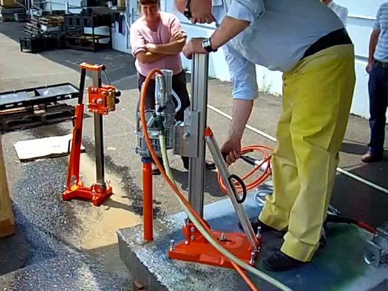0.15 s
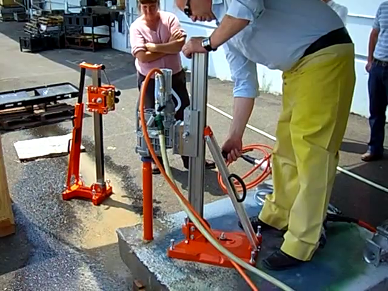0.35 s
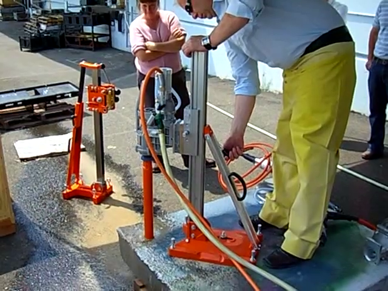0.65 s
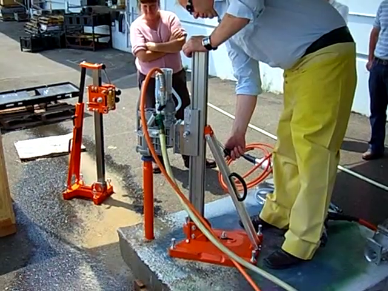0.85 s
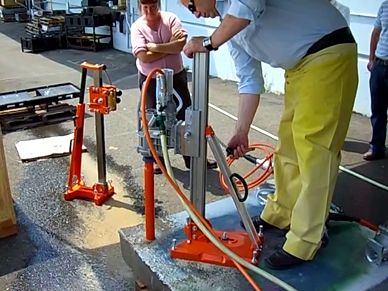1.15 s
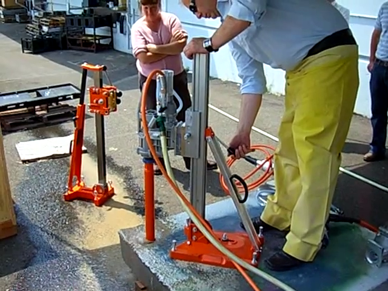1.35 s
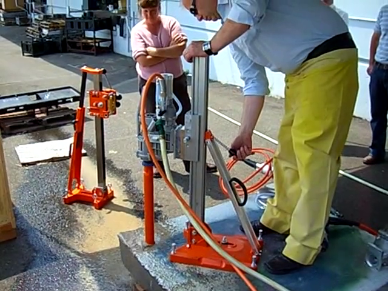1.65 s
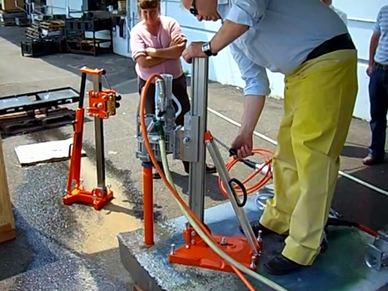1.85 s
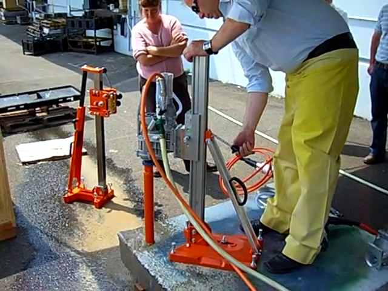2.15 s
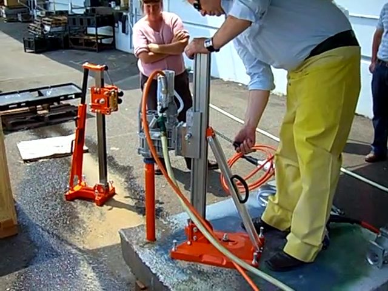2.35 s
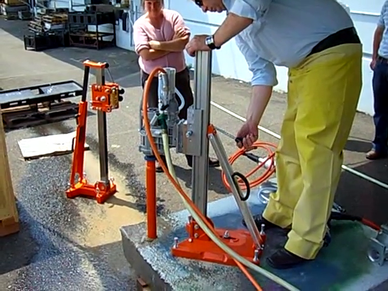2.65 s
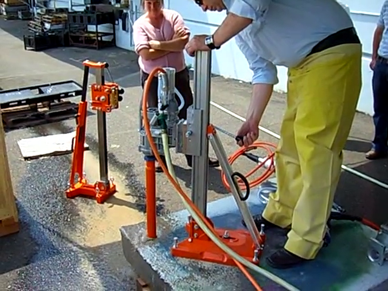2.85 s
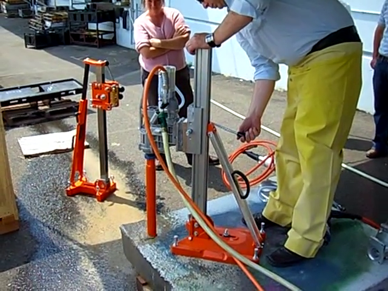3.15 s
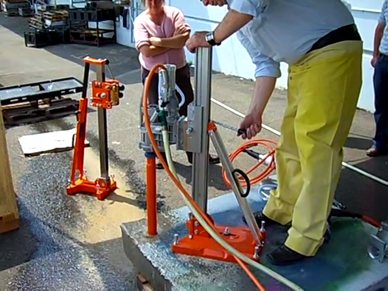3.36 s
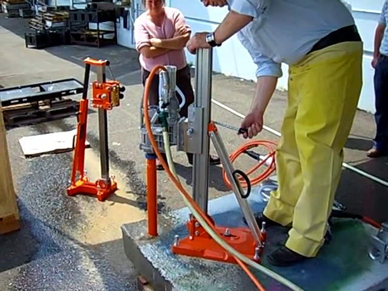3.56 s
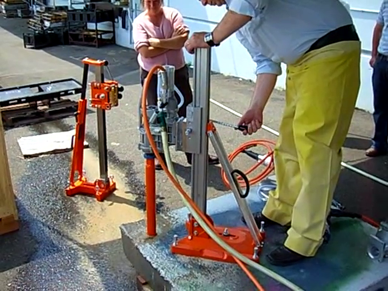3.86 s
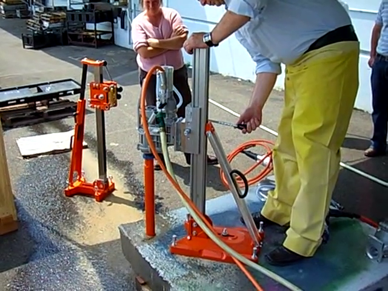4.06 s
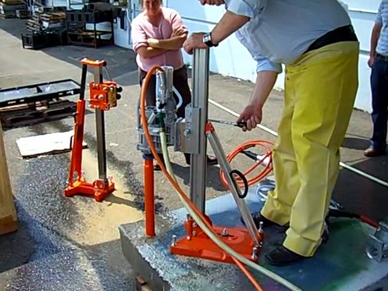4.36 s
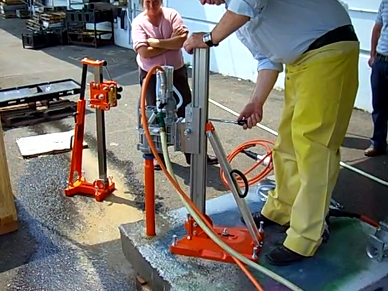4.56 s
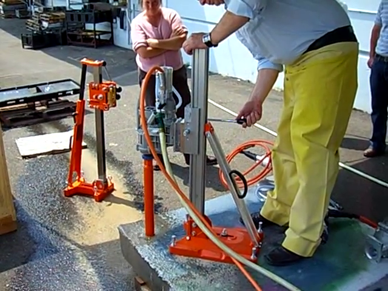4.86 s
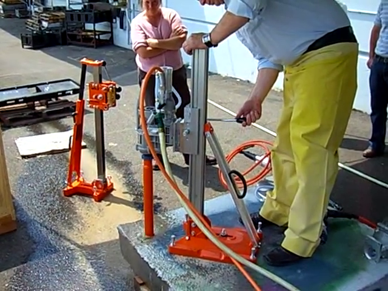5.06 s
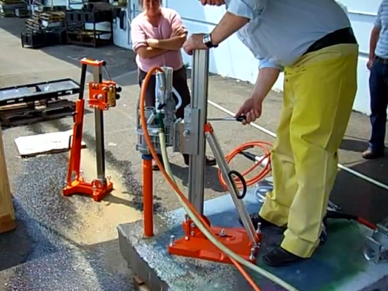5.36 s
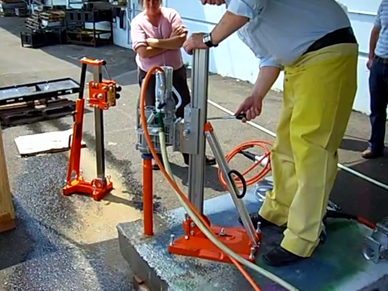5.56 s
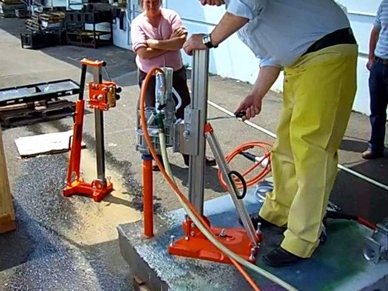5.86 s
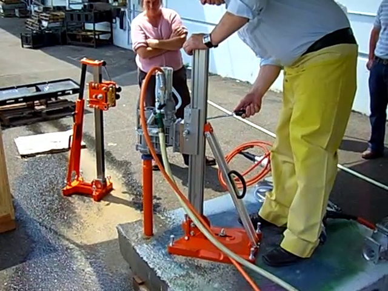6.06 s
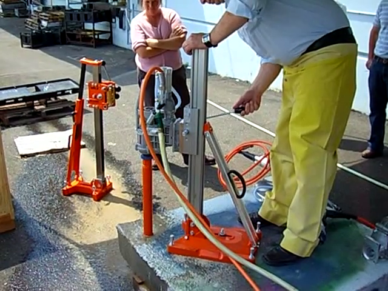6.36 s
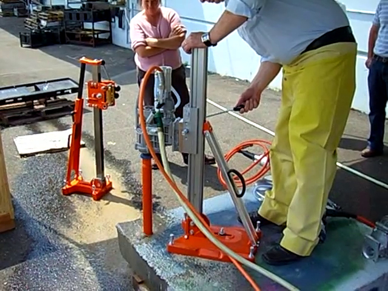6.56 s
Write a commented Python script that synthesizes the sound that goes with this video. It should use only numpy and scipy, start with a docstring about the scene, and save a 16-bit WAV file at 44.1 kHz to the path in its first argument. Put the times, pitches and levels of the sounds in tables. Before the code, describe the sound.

An electric core drill whines shrill and steady while grinding into wet concrete outdoors, with a rough metallic rattle and rushing spray hiss.

```python
"""Outdoors, an electric core drill on a steel stand bores into wet concrete.
Motor pinion and three geared shafts whine as tones locked to one drifting motor speed.
The diamond crown is noise plus a clatter pattern repeated each turn, coloured by barrel, gearbox and stand;
bass follows levels of its own through foot and column, and single spindle hums swell for a moment.
Cooling air and water hiss as treble noise; a light breeze rumbles as low noise on the microphone."""
import sys
import numpy as np
from scipy import signal
from scipy.fft import rfft, irfft
from scipy.io import wavfile
from scipy.ndimage import map_coordinates

SR = 44100
rng = np.random.default_rng(int(sys.argv[2]) if len(sys.argv) > 2 else 0)


def voltage_ratio(decibels):
    """Convert decibels (scalar or array-like) to amplitude ratios, 20 dB per decade."""
    exponent = np.asarray(decibels, float) / 20
    return 10 ** exponent


def transcribe(u):
    """Save the signal u as a 16-bit wav file named by the first command-line argument.

    u: samples, shape (n,) or (channels, n), limited to [-1, 1]; the rate is SR.
    q: integer samples, one column per channel.
    """
    v = np.clip(np.atleast_2d(u).T, -1, 1)
    q = np.round(v * 32767).astype(np.int16)
    wavfile.write(sys.argv[1], SR, q)


N = 295470

PINION_TEETH, MESH_TEETH = 9, 14
# turns of each shaft per motor turn
FIRST_SHAFT, SECOND_SHAFT, SPINDLE = 9 / 38, 9 / 38 * 12 / 31, 1 / 28.4665


def curve(table):
    """A drawn automation curve: straight lines between the points, first column in seconds."""
    seconds, values = np.transpose(table)
    return np.interp(np.arange(N) / SR, seconds, values)


def walk(rate):
    """Random drift: rate new values a second, joined by half-cosine slides; spread near 1."""
    knots = rng.standard_normal(int(N * rate / SR) + 3)
    # computed once every 64 samples, then held
    place = np.arange(0, N + 64, 64) * rate / SR
    whole = place.astype(int)
    slide = .5 - .5 * np.cos(np.pi * (place - whole))
    coarse = 1.15 * (knots[whole] * (1 - slide) + knots[whole + 1] * slide)
    return np.repeat(coarse, 64)[:N]


def shape(points):
    """Filter gain at every frequency from (Hz, dB) points, joined on a log frequency scale."""
    hz, db = np.transpose(points)
    return voltage_ratio(np.interp(np.log(np.fft.rfftfreq(N, 1 / SR) + 1), np.log(hz), db))


def band_level(spectrum, lo_hz, hi_hz):
    """Turns a spectrum into a wave, scaled so that its band from lo_hz to hi_hz has rms 1."""
    band = spectrum[int(lo_hz * N / SR):int(hi_hz * N / SR)]
    return irfft(spectrum, N) * N / np.sqrt(2 * np.sum(np.abs(band) ** 2))


def tone(turns, db, waver_db, waver_rad):
    """A sine locked to a shaft, of nominal rms db; strength and phase waver at random, each tone on its own."""
    # 8.7 dB is about one unit of relative gain
    strength = np.clip(1 + waver_db / 8.7 * walk(4), 0, None)
    phase = 2 * np.pi * turns + waver_rad * walk(2.99)
    return np.sqrt(2) * voltage_ratio(db) * strength * np.cos(phase)


# Motor speed. Each row: time in seconds, pinion tooth rate in Hz.
PINION_RATE = [(0, 4446.9), (0.35, 4445.6), (0.72, 4452.4), (1.75, 4442.6), (1.95, 4444.8), (2.35, 4443.6),
               (2.6, 4448.8), (3.15, 4443.2), (3.9, 4444.2), (4.7, 4447.2), (5.33, 4451.8), (5.65, 4446.9),
               (6.15, 4445.7), (6.4, 4446.8), (6.7, 4446.7)]


def motor_turns():
    """The motor's angle in turns, the running sum of its drifting speed."""
    return np.cumsum(curve(PINION_RATE)) / SR / PINION_TEETH


# Pinion whine. Each row: time in seconds, level in dB.
WHINE_LEVEL = [(0, -18.3), (0.3, -17.7), (1.0, -20.5), (1.65, -18.7), (2.2, -18), (2.65, -18.8), (3.1, -18),
               (3.5, -20.5), (4.4, -22.5), (4.9, -23), (5.1, -26), (5.45, -26.7), (5.7, -23), (6.3, -21.7),
               (6.5, -24.7), (6.69, -23.5)]
# Tones of the motor shaft. Each row: multiple of the motor's turning rate, level in dB.
MOTOR_TONES = [(1.0, -56), (2.0, -53), (4.5, -46), (5.5, -49), (10.0, -34), (12.0, -45), (13.0, -50),
               (13.5, -45), (15.0, -48), (17.0, -48), (18.0, -39), (19.0, -45), (21.0, -47), (22.5, -49),
               (23.0, -54), (24.0, -53), (27.0, -55), (30.0, -56)]
# Bearing tones and beats between shafts. Each row: multiple of the motor's turning rate, level in dB.
BEAT_TONES = [(1.319, -45), (1.354, -45), (1.386, -47), (1.735, -54), (1.86, -50), (2.31, -45),
              (2.373, -44), (2.618, -46), (8.908, -47), (8.965, -43), (9.196, -46), (9.904, -37),
              (10.089, -46), (16.346, -55), (20.313, -47), (22.046, -45), (23.453, -52), (29.763, -63)]
# Tones of the first geared shaft. Each row: multiple of its turning rate, level in dB.
FIRST_SHAFT_TONES = [(4, -57), (24, -44), (36, -51), (37, -44), (39, -40), (40, -47), (41, -42), (48, -43),
                     (58, -51), (69, -52), (70, -51), (77, -48), (90, -51), (99, -49), (105, -57)]
# Tones of the second geared shaft. Each row: multiple of its turning rate, level in dB.
SECOND_SHAFT_TONES = [(14, -36), (23, -47), (27, -52), (28, -34), (29, -51), (30, -44), (42, -47),
                      (56, -47), (61, -45), (63, -44), (70, -50), (92, -45), (94, -41), (169, -52)]
# Tones of the spindle. Each row: multiple of its turning rate, level in dB ahead of the stand.
SPINDLE_TONES = [(9, -50), (15, -50), (16, -50), (17, -48), (18, -50), (19, -50), (20, -46), (22, -47),
                 (23, -54), (25, -53), (29, -54), (31, -41), (32, -51), (33, -52), (38, -34), (39, -36),
                 (61, -42), (62, -31), (63, -50), (75, -36), (76, -37), (77, -33), (79, -49), (93, -40),
                 (115, -50), (186, -44)]


def gears(motor):
    """Gear teeth and run-out sound at fixed multiples of each shaft's rate, under the pinion whine."""
    out = tone(PINION_TEETH * motor, curve(WHINE_LEVEL), .3, 0)
    for multiple, db in MOTOR_TONES + BEAT_TONES:
        out += tone(multiple * motor + rng.random(), db, 1.4, .2)
    for multiple, db in FIRST_SHAFT_TONES:
        out += tone(multiple * FIRST_SHAFT * motor + rng.random(), db, 1.4, .2)
    # overtones of the tooth mesh peak together, at each tooth contact; the rest start anywhere
    for multiple, db in SECOND_SHAFT_TONES:
        start = 0 if multiple % MESH_TEETH == 0 else rng.random()
        out += tone(multiple * SECOND_SHAFT * motor + start, db, 1.2, .2)
    # neighbouring spindle tones line up once a turn, so they throb at the barrel's high spot
    for multiple, db in SPINDLE_TONES:
        # spindle angle in turns where the throbs near 660 Hz and near 1320 Hz peak
        high_spot = .32 if multiple < 50 else .921
        lined_up = 35 < multiple < 40 or 70 < multiple < 80
        angle = SPINDLE * motor - (high_spot if lined_up else rng.random())
        # the low ones pass through the loose stand and waver more
        waver_db = 2.5 if multiple < 30 else 1.2
        out += tone(multiple * angle, db, waver_db, .2)
    return out


def clatter(spindle, life_turns):
    """Noise written around the crown and read every turn; it blends into a new pattern as it wears."""
    size = 2048  # points around the crown
    orders = rfft(rng.standard_normal((int(spindle[-1] / life_turns) + 4, size)))
    # the strong spindle multiples sound as steady tones of their own
    orders[:, [multiple for multiple, _ in SPINDLE_TONES]] = 0
    place = [spindle / life_turns, spindle % 1 * size]
    return map_coordinates(irfft(orders), place, order=1, mode="grid-wrap")


# Resonances and dips of barrel, gearbox and stand.
# Each row: centre in Hz, width in Hz at half the lift, lift in dB (negative for a dip).
BODY_RESONANCES = [(180.4, 48, 8.5), (320, 145, 6.5), (610, 92, 7.5), (679.4, 64, 11), (948, 35, 5.5),
                   (1080, 40, -1.5), (1347, 25, 5), (1570, 180, 2.5), (2180, 210, 2), (2890, 160, 3.5),
                   (3520, 170, 2.5), (3900, 140, 4.5), (4200, 50, -3), (5225, 110, 4), (5760, 140, 2),
                   (4120, 60, 3), (5360, 300, -4), (1924, 67, -4), (7330, 200, -20), (5890, 170, 1),
                   (5940, 60, -3), (2700, 78, 2), (776, 51, 3.5), (7460, 120, 8)]


def body():
    """Gain of the ringing metal: bell-shaped lifts that add in dB."""
    f = np.fft.rfftfreq(N, 1 / SR)
    return voltage_ratio(sum(db / (1 + (2 * (f - hz) / width) ** 4) for hz, width, db in BODY_RESONANCES))


# Colour of the grinding ahead of the resonances. Each row: frequency in Hz, relative density in dB.
GRIND_COLOUR = [(60, -16), (130, -16.5), (500, -11.5), (850, -12.5), (950, -7), (2000, -5.5), (3500, -2),
                (6000, 0), (7300, -6.5), (9500, -14.5), (17000, -57)]
# Share of the grinding that repeats every turn. Each row: frequency in Hz, dB against the random part.
REPEATING_SHARE = [(100, -9), (450, -5), (700, -6), (1300, -2), (2000, -6), (4000, -9), (6500, -20),
                   (17000, -30)]


def crown(spindle, feed):
    """Diamonds grind the concrete: fresh grit plus repeating clatter, through barrel and stand."""
    repeats = clatter(spindle, life_turns=12.08)
    grit = rng.standard_normal(N)
    # four passes of harder contact a turn, and a slighter one once a turn
    grit *= 1 + .12 * np.sin(2 * np.pi * 4 * spindle) + .05 * np.sin(2 * np.pi * spindle)
    grit *= voltage_ratio(.69 * walk(6.5) + .67 * walk(40))
    mix = rfft(grit) + rfft(repeats / repeats.std()) * shape(REPEATING_SHARE)
    # dB at light feed, plus the rise in dB at firm feed
    level_db = -25.5 + 2.5 * feed
    return voltage_ratio(level_db) * band_level(mix * shape(GRIND_COLOUR) * body(), lo_hz=1710, hi_hz=3910)


# Bass carried by the whole stand. Each row: frequency in Hz, gain in dB.
BASS_SHARE = [(420, 0), (500, -40), (600, -90)]
# The part of it carried by the foot. Each row: frequency in Hz, gain in dB.
FOOT_SHARE = [(215, 0), (255, -40), (300, -90)]
# Bass from the foot. Each row: time in seconds, level in dB.
FOOT_LEVEL = [(0, -45.5), (0.5, -42), (1.9, -44.5), (2.7, -42), (3.5, -46.5), (4.75, -46), (5.05, -40),
              (5.55, -40), (5.9, -46.5), (6.69, -43.5)]
# Bass from the column. Each row: time in seconds, level in dB.
COLUMN_LEVEL = [(0, -39), (0.7, -36), (1.9, -39.5), (2.4, -35.5), (3.5, -40), (4.7, -38), (6.69, -39)]


def stand(drill):
    """The drill's bass reaches the air through foot and column of the stand, each swelling on its own."""
    spectrum, bass, foot = rfft(drill), shape(BASS_SHARE), shape(FOOT_SHARE)
    direct = irfft(spectrum * (1 - bass), N)
    from_foot = band_level(spectrum * foot, lo_hz=130, hi_hz=230)
    from_column = band_level(spectrum * (bass - foot), lo_hz=230, hi_hz=420)
    return direct + voltage_ratio(curve(FOOT_LEVEL)) * from_foot + voltage_ratio(curve(COLUMN_LEVEL)) * from_column


# Spindle hums that swell for a moment.
# Each row: start in seconds, length in seconds, multiple of the spindle rate, level in dB at full swell.
HUM_SWELLS = [(0, .32, 41, -38), (1.55, 1.1, 20, -40), (4.5, .7, 17, -43), (5.5, 1.2, 15, -44)]


def hums(spindle):
    """Single spindle tones rise and fade as the stand takes them up."""
    t = np.arange(N) / SR
    out = np.zeros(N)
    for start, length, multiple, db in HUM_SWELLS:
        swell = np.sin(np.pi * np.clip((t - start) / length, 0, 1)) ** .5
        out += swell * tone(multiple * spindle + rng.random(), db, 1.5, .2)
    return out


# Colour of cooling air and water spray. Each row: frequency in Hz, relative density in dB.
HISS_COLOUR = [(3000, -29), (6000, -11.5), (8400, -1), (9700, 0.5), (10300, -1.5), (10650, 0.5),
               (11200, -6.5), (11900, -11.5), (12250, -16), (12700, -14), (13200, -14.5), (14500, -20),
               (14850, -18), (17000, -22.5)]


def hiss(spindle, feed):
    """Spray and cooling air: noise that flickers as a whole and swings with the turning barrel."""
    swing = 1 + .07 * np.sin(2 * np.pi * spindle) + .07 * np.sin(4 * np.pi * spindle)
    flicker = voltage_ratio(.5 * walk(20) + .5 * walk(70))
    spray = rng.standard_normal(N) * swing * flicker
    # dB at light feed, plus the rise in dB at firm feed
    level_db = -26 + 3 * feed
    return voltage_ratio(level_db) * band_level(rfft(spray) * shape(HISS_COLOUR), lo_hz=8150, hi_hz=12000)


def breeze():
    """Low rumble of moving air on the microphone; it freshens steadily, with random gusts."""
    colour = shape([(10, -6), (30, -2.5), (70, -8.0), (125, -12.0), (400, -42), (17000, -90)])
    air = rfft(rng.standard_normal(N)) * colour
    # starting dB, rise in dB per second, gust spread in dB
    level_db = -49.5 + .65 * np.arange(N) / SR + 1 * walk(1.4)
    return voltage_ratio(level_db) * band_level(air, lo_hz=23, hi_hz=70)


# Feed pressure on the crown. Each row: time in seconds, pressure from 0 (light) to 1 (firm).
FEED_PRESSURE = [(0, 0.0), (0.7, 0.28), (1.8, 0.072), (2.5, 0.3), (3.5, 0.14), (4.4, 0.73), (5.3, 0.7),
                 (5.9, 0.78), (6.69, 0.62)]


def scene():
    """All parts turn from the one motor speed; firmer feed makes grinding and spray louder."""
    motor = motor_turns()
    spindle = SPINDLE * motor
    feed = curve(FEED_PRESSURE)
    drill = stand(gears(motor) + crown(spindle, feed))
    mix = drill + hums(spindle) + hiss(spindle, feed) + breeze()
    return mix[None]  # one channel


def top_cut(x):
    """Nothing passes above the cut-off."""
    return signal.sosfilt(signal.butter(12, 17280, fs=SR, output="sos"), x)


def record(dry):
    """The camera has a narrow dip in the treble."""
    notch_hz = 7995
    dip = shape([(notch_hz - 450, 0), (notch_hz - 200, -5), (notch_hz - 60, -13), (notch_hz, -21),
                 (notch_hz + 60, -13), (notch_hz + 200, -5), (notch_hz + 450, 0)])
    finished = irfft(rfft(dry) * dip, N)
    return top_cut(finished)


dry = scene()
out = record(dry)
transcribe(out)
```